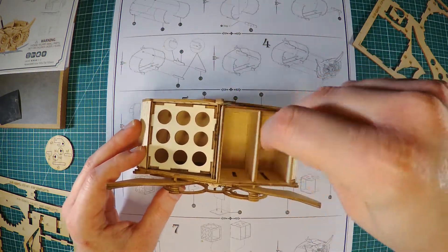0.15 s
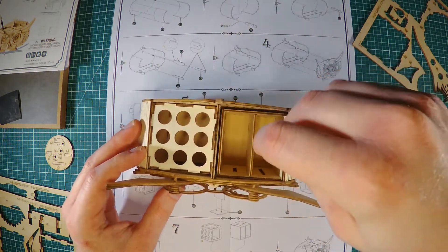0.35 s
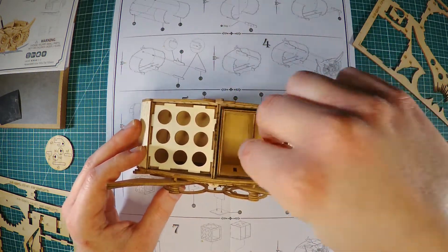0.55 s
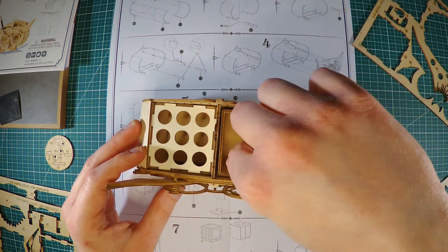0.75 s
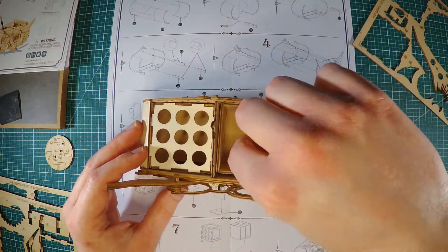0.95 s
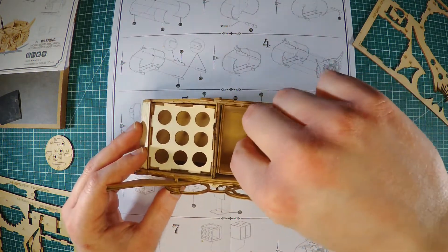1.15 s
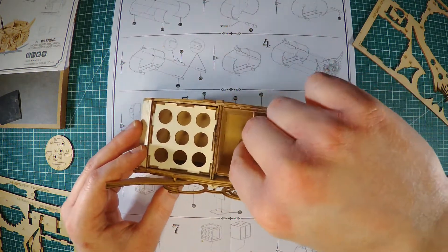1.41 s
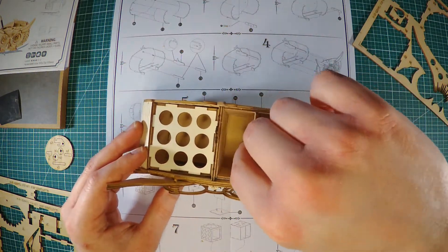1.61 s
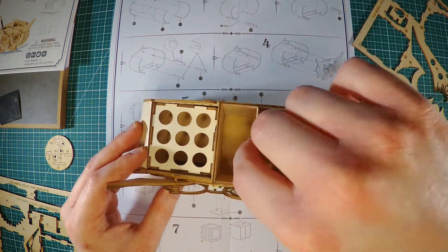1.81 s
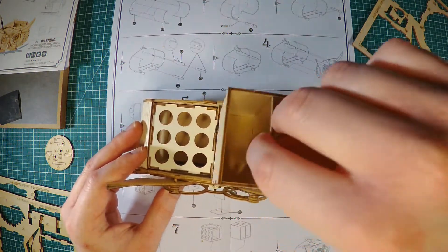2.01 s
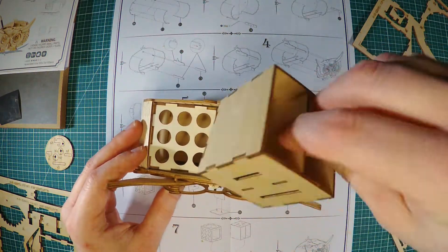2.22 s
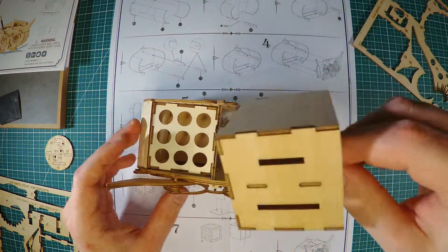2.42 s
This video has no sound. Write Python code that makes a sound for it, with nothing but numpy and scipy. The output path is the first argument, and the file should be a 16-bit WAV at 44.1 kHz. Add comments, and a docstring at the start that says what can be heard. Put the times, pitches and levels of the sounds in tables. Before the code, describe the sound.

Close up, light plywood slides briefly and clacks against its frame, pauses with small tocks and ticks, then drags out with grainy scraping, tiny squeaks and soft final rustles, over low mains hum in a quiet room.

```python
"""A small plywood tray is pushed home in a wooden model on a table, nudged, then drawn out and lifted clear.
Knocks are impulses with noise chatter that ring panel modes, crack at the edge and thump the table.
Sliding is grainy friction noise through wood colours; squeaks are gliding tones; stop taps are hollow tocks.
Close perspective in a small quiet room (side scatter, short noise tail), faint mains hum and noise floor."""
import sys
import numpy as np
from scipy import signal
from scipy.fft import rfft, irfft
from scipy.io import wavfile
from scipy.ndimage import map_coordinates

SR = 44100
rng = np.random.default_rng(int(sys.argv[2]) if len(sys.argv) > 2 else 0)


def output_pcm(signal):
    """Save a mono or channel-first signal as 16-bit PCM at the path in sys.argv[1].

    Samples are clipped to [-1, 1] before scaling.
    """
    pcm = np.clip(np.atleast_2d(signal).T, -1, 1) * 32767
    wavfile.write(sys.argv[1], SR, np.round(pcm).astype(np.int16))


N = 114660
T = np.arange(N) / SR
HALF_S = T[:SR // 2]
TENTH_S = T[:SR // 10]


def undb(db):
    """Decibels to amplitude gain."""
    return 10 ** (np.asarray(db) / 20)


def unit(x):
    """Scale to unit energy."""
    return x / np.sqrt(np.sum(x ** 2) + 1e-18)


def through(x, response):
    """Convolve with an impulse response, cut to N samples."""
    return signal.fftconvolve(x, response)[:N]


def highpass(x, cut_hz, order=2):
    """Butterworth high-pass."""
    return signal.sosfilt(signal.butter(order, cut_hz, "high", fs=SR, output="sos"), x)


def colour(points, size=4096):
    """Minimum-phase unit-energy response with the given spectrum, built by folding the cepstrum."""
    hz, db = np.array(points, float).T
    bin_hz = np.arange(size // 2 + 1) * SR / size
    gain = undb(np.interp(np.log(bin_hz + 1), np.log(hz), db))
    cepstrum = irfft(np.log(gain))
    cepstrum[1:size // 2] *= 2
    cepstrum[size // 2 + 1:] = 0
    return unit(irfft(np.exp(rfft(cepstrum))))


def fade(t60_s):
    """Exponential decay, 60 dB per t60, half a second long."""
    return np.exp(-np.log(1000) * HALF_S / t60_s)


def ring(modes, t60_s):
    """Struck object: damped sines, high-passed at the first mode since it radiates little below."""
    sines = sum(undb(db) * np.sin(2 * np.pi * hz * HALF_S) for hz, db in modes)
    return unit(highpass(sines * fade(t60_s), modes[0][0]))


def blow(start_s):
    """One impulse with the energy of 10 ms at full level."""
    return (np.arange(N) == int(start_s * SR)) * np.sqrt(SR / 100)


def stroke(start_s, length_s, attack_s, release_s):
    """Linear attack, hold, exponential release."""
    rise = np.clip((T - start_s) / attack_s, 0, 1)
    return rise * np.exp(-np.maximum(T - start_s - length_s, 0) / release_s)


def wander(rate_hz):
    """Random control: straight lines between normal values drawn at rate_hz."""
    return np.interp(T * rate_hz, np.arange(8000), rng.standard_normal(8000))


def pan(db):
    """Left and right gains, db apart; positive favours left."""
    return undb(np.array([[db], [-db]]) / 2)


# mains hum partials: (frequency [Hz], RMS level before pan [dB])
HUM_PARTIALS = [(50, -56.5), (150.3, -68.5), (250.3, -82)]
# noise floor spectrum: (frequency [Hz], relative level [dB])
FLOOR_SPECTRUM = [(25, 7.5), (70, -3), (200, -12), (500, -19.5), (1500, -26.5), (5000, -34.5),
                  (15000, -35.5)]
HUM_PAN_DB, FLOOR_DB = 7.5, -63


def background():
    """Mains hum as steady sines, stronger on the left, over independent coloured noise per side."""
    hum = sum(np.sqrt(2) * undb(db) * np.sin(2 * np.pi * (hz * T + rng.random()))
              for hz, db in HUM_PARTIALS)
    air = np.array([through(rng.standard_normal(N), colour(FLOOR_SPECTRUM)) for _ in range(2)])
    return hum * pan(HUM_PAN_DB) + undb(FLOOR_DB) * air


# desk scatter spectrum: (frequency [Hz], relative level [dB])
DESK_SPECTRUM = [(100, -3.5), (1500, -7.5), (4000, -3.5), (15000, 4.5)]
# room tail per band: (level [dB], T60 before the cap [s])
TAIL_BANDS = [(-9, 0.51), (-2, 0.22), (-6.5, 0.32), (-12, 0.3), (-7, 0.28), (-15, 0.33)]
# tail band edges: (frequency [Hz])
TAIL_EDGES_HZ = [40, 260, 750, 1700, 3000, 7000, 16000]
DESK_DECAY_S, DESK_DB = .001, -6.5
TAIL_T60_CAP_S, TAIL_RISE_S, TAIL_LIKENESS = .38, 0.0057, 0.42  # likeness: noise power shared by both sides


def desk_scatter(x):
    """Quick scatter from the desk; an odd kernel shifts phase between the ears, not level."""
    burst = rng.standard_normal(len(HALF_S)) * np.exp(-HALF_S / DESK_DECAY_S)
    desk = unit(through(burst, colour(DESK_SPECTRUM)))[:len(HALF_S)]
    return signal.fftconvolve(x, unit(np.r_[-desk[::-1], 0, desk]), "same")


def room_tail(noise):
    """Room reverberation: noise split into bands, each with its own level and decay."""
    size = len(noise)
    spectrum, hz = rfft(noise), np.arange(size // 2 + 1) * SR / size

    def below(edge_hz):
        """Smooth low-pass gain."""
        return 1 / (1 + (hz / edge_hz) ** 8)

    tail = np.zeros(size)
    for (db, t60_s), low_hz, high_hz in zip(TAIL_BANDS, TAIL_EDGES_HZ, TAIL_EDGES_HZ[1:]):
        band = irfft(spectrum * (below(high_hz) - below(low_hz)), size)
        decay = unit(fade(min(t60_s, TAIL_T60_CAP_S)) * np.minimum(HALF_S / TAIL_RISE_S, 1))
        tail += undb(db) * band * decay
    return tail


def room(x, send):
    """Direct sound plus sideways desk scatter and a partly shared tail per side."""
    shared = rng.standard_normal(len(HALF_S))
    sideways = undb(DESK_DB) * desk_scatter(x)
    out = []
    for side in (1, -1):
        own = rng.standard_normal(len(HALF_S))
        noise = np.sqrt(TAIL_LIKENESS) * shared + np.sqrt(1 - TAIL_LIKENESS) * own
        out.append(x + through(send, room_tail(noise)) + side * sideways)
    return np.array(out)


# catching edges: (start [s], length [s], first pitch [Hz], last pitch [Hz], level before flutter [dB])
SQUEAK_EVENTS = [(0.031, 0.0047, 1720, 1555, -49), (0.175, 0.014, 2980, 2840, -58),
                 (0.861, 0.018, 8000, 7870, -57.5), (1.963, 0.0027, 1400, 1420, -41.5),
                 (1.995, 0.0089, 1111, 1038, -44.5), (1.994, 0.0087, 8700, 8750, -39),
                 (2.038, 0.0048, 2050, 2000, -49), (2.042, 0.0246, 4460, 4250, -57),
                 (2.049, 0.0061, 1340, 1400, -47.5), (2.049, 0.013, 8400, 8600, -49),
                 (2.097, 0.0124, 2400, 2650, -61), (2.098, .012, 4190, 4370, -61)]
SQUEAK_ATTACK_S, SQUEAK_RELEASE_S = 0.0036, 0.00096
SQUEAK_JITTER, SQUEAK_JITTER_HZ, SQUEAK_FLUTTER_DB = .025, 900, 5  # jitter: fraction of pitch


def squeaks():
    """A tight edge sticks and slips fast enough to give a short, rough, gliding tone."""
    out = np.zeros(N)
    for start_s, length_s, first_hz, last_hz, db in SQUEAK_EVENTS:
        glide_hz = np.interp(T, [start_s, start_s + length_s], [first_hz, last_hz])
        hz = glide_hz * (1 + SQUEAK_JITTER * wander(SQUEAK_JITTER_HZ))
        flutter = undb(db + SQUEAK_FLUTTER_DB * wander(SQUEAK_JITTER_HZ))
        level = flutter * stroke(start_s, length_s, SQUEAK_ATTACK_S, SQUEAK_RELEASE_S)
        out += np.sqrt(2) * level * np.sin(2 * np.pi * np.cumsum(hz) / SR)
    return out


# tray on its stop: (time [s], wood level [dB], bass thump level [dB])
STOP_TAPS = [(0.8705, -46.5, -66), (0.8719, -37, -53)]
# stop modes: (frequency [Hz], relative level [dB])
STOP_WOOD_MODES = [(390, -14), (640, 2), (901, -10.5), (1072, 8), (1215, 2), (1577, 13.5), (2035, -3.5),
                   (2264, -10)]
# room standing waves: (frequency [Hz], relative level [dB])
STANDING_WAVES = [(119, 7), (182, -9), (283, -12.5)]
STOP_T60_S, TAP_PUSH_S, STANDING_T60_S = .02, 0.000052, .3


def taps():
    """The tray meets its stop softly: a compact, hollow tock with a little room bass."""
    wood = sum(undb(db) * blow(start_s) for start_s, db, _ in STOP_TAPS)
    thump = sum(undb(db) * blow(start_s) for start_s, _, db in STOP_TAPS)
    tock = unit(through(ring(STOP_WOOD_MODES, STOP_T60_S), np.exp(-TENTH_S / TAP_PUSH_S)))
    return through(thump, ring(STANDING_WAVES, STANDING_T60_S)) - through(wood, tock)


GRAINS_PER_S, GRAIN_SPREAD_DB, SMOOTH_SHARE = 2200, 2.5, .5
CATCHES_PER_S, CATCH_DECAY_S, CATCH_SPREAD_DB, SLIDE_SHARE = 150, .004, 2, .75


def friction():
    """Wood fibres catch and slip: dense uneven grains that flare at each small catch and die back."""
    grain_gain = undb(GRAIN_SPREAD_DB * np.minimum(rng.exponential(size=N), 5))
    grains = (rng.random(N) < GRAINS_PER_S / SR) * rng.choice([-1, 1], N) * grain_gain
    catches = (rng.random(N) < CATCHES_PER_S / SR) * undb(CATCH_SPREAD_DB * rng.uniform(-1, 1, N))
    flare_power = through(catches ** 2, np.exp(-2 * T / CATCH_DECAY_S))
    grip = np.sqrt(SLIDE_SHARE ** 2 + flare_power)
    texture = unit(grains) + SMOOTH_SHARE * unit(rng.standard_normal(N))
    return np.sqrt(N) * unit(grip * texture)


WOBBLE, WOBBLE_HZ = .025, 35  # wobble: fraction of ratio


def shifting(x, ratio):
    """Shift resonances by reading at a varying speed, wobbling as the point of contact shifts."""
    speed = ratio * (1 + WOBBLE * wander(WOBBLE_HZ))
    return map_coordinates(x, [np.cumsum(speed)], mode="mirror")


# short rubs: (start [s], length [s], cavity [dB], panel [dB], rasp [dB], hiss [dB], hollow [dB])
RUB_EVENTS = [(.002, .066, -52.5, -55.5, -53.5, -58, -51),
              (0.098, 0.063, -49.5, -52.5, -55.5, -56.5, -67.5), (0.165, 0.017, -49, -54, -54, -59, -75),
              (0.758, 0.048, -72, -65, -68.5, -77, -74), (0.834, 0.047, -62.5, -57, -59.5, -63, -64),
              (0.885, 0.066, -97.5, -67.5, -73.5, -65, -73.5), (1.167, 0.044, -73, -68, -65, -71, -72),
              (1.464, 0.053, -63, -67, -62, -62.5, -64), (2.198, 0.011, -73, -74, -62, -58.5, -70),
              (2.211, 0.015, -59, -60, -61.5, -57.5, -70), (2.249, 0.085, -67.5, -77, -72, -73, -83),
              (2.309, 0.013, -65.5, -69, -74, -77, -101), (2.428, 0.045, -69, -76.5, -69.5, -73, -79.5)]
# long pull: (time [s], cavity [dB], panel [dB], rasp [dB], hiss [dB], hollow of the opening tray [dB])
PULL_LEVELS = [(1.522, -69, -70, -70.5, -75, -71.5), (1.621, -57.5, -68, -64.5, -67.5, -73),
               (1.652, -53.5, -76, -52, -57.5, -74), (1.68, -49.5, -66, -50, -55, -59.5),
               (1.75, -51.5, -64, -56.5, -57, -77), (1.82, -57, -66, -55.5, -50.5, -60),
               (1.88, -56.5, -65.5, -58, -59.5, -53.5), (1.95, -53.5, -59, -58, -53.5, -56),
               (2.019, -59.5, -64, -60, -52.5, -56), (2.043, -55, -49, -66, -55, -76),
               (2.08, -67, -64.5, -55.5, -54.5, -69), (2.11, -64, -57.5, -67, -59, -98),
               (2.122, -93, -84, -102, -97, -93)]
# tray cavity resonance before wobble: (time [s], frequency [Hz])
CAVITY_TRACK = [(.03, 1500), (.12, 1354), (1.58, 1487), (1.69, 1395), (1.78, 1408), (1.93, 1195),
                (2.04, 1379), (2.11, 1465), (2.3, 1417)]
# rubbing spectra: (frequency [Hz], relative level [dB])
CAVITY_SPECTRUM = [(100, -52.5), (500, -36), (900, -15), (1170, -12.5), (1300, 1), (1400, 0.5), (1520, 3),
                   (1700, -7), (2400, -20), (6000, -49.5)]
PANEL_SPECTRUM = [(500, -26), (1500, -21.5), (1780, -7.5), (1940, -1), (2050, 0.5), (2280, -15.5),
                  (2580, -21.5), (2880, -12), (3200, -25.5), (6000, -47)]
RASP_SPECTRUM = [(300, -46), (1500, -13.5), (2500, -11), (2850, -8.5), (3250, -6.5), (3650, 0.5), (4250, 0),
                 (4700, -4), (5500, -9.5), (6200, -3), (6700, -10.5), (7400, -7), (9000, -24),
                 (16000, -43.5)]
HISS_SPECTRUM = [(500, -54.5), (4000, -34.5), (7000, -7.5), (7800, -2.5), (8400, 1.5), (8850, -3),
                 (9300, 0), (9800, -3.5), (10400, -3), (11700, -12), (13300, -12), (15800, -16.5)]
HOLLOW_SPECTRUM = [(40, -40), (120, -12), (220, -5.5), (350, 3.5), (520, -11.5), (820, -14.5), (1000, 2.5),
                   (1200, -7.5), (1500, -11), (3000, -42)]
CAVITY_REST_HZ = 1400  # reference for the track
RUB_ATTACK_S, RUB_RELEASE_S = 0.016, 0.007
RUMBLE_DB, RUMBLE_T60_S = -12.5, 0.075
HAND_LAG_S, HAND_SWAY_S, HAND_RATE_HZ, HAND_DB = .0016, 0.00023, 7, -8


def slide_drives():
    """Drive gains of the five wood colours: the pull's level curves plus each rub's stroke."""
    times_s, *levels = np.array(PULL_LEVELS).T
    drives = [undb(np.interp(T, times_s, db, left=-140, right=-140)) for db in levels]
    for start_s, length_s, *rub_levels in RUB_EVENTS:
        shape = stroke(start_s, length_s, RUB_ATTACK_S, RUB_RELEASE_S)
        for k, db in enumerate(rub_levels):
            drives[k] = drives[k] + undb(db) * shape
    return drives


def hand_reflection(x):
    """The moving hand reflects the slides: one echo with a swaying delay, power-compensated."""
    lag_s = HAND_LAG_S + HAND_SWAY_S * wander(HAND_RATE_HZ)
    echo = map_coordinates(x, [(T - lag_s) * SR])
    return (x + undb(HAND_DB) * echo) / np.hypot(1, undb(HAND_DB))


def slides():
    """One friction force drives cavity, panel, edge rasp, hiss, hollow and a faint rumble."""
    cavity_drive, panel_drive, rasp_drive, hiss_drive, hollow_drive = slide_drives()
    force = friction()
    cavity_ratio = np.interp(T, *np.array(CAVITY_TRACK).T) / CAVITY_REST_HZ
    cavity = cavity_drive * shifting(through(force, colour(CAVITY_SPECTRUM)), cavity_ratio)
    rasp = rasp_drive * shifting(through(force, colour(RASP_SPECTRUM)), 1)
    panel = through(force * panel_drive, colour(PANEL_SPECTRUM))
    hiss = through(force * hiss_drive, colour(HISS_SPECTRUM))
    hollow = through(force * hollow_drive, colour(HOLLOW_SPECTRUM))
    rumble = undb(RUMBLE_DB) * through(force * rasp_drive, ring(STANDING_WAVES, RUMBLE_T60_S))
    return hand_reflection(cavity + rasp + panel + hiss + hollow + rumble)


# tray on frame: (time [s], chatter decay [s], panel [dB], crack [dB], table thump [dB], low cut [Hz]);
# a small point of contact has a higher cut
KNOCK_EVENTS = [(.058, 0.036, -48, -53, -46.5, 488), (0.2148, 0.0088, -49.5, -46.5, -52, 980),
                (0.227, 0.0069, -38, -50.5, -49, 900), (0.2382, 0.009, -36.5, -32, -30.5, 308),
                (0.2421, 0.0013, -27.5, -33, -22, 199), (.252, 0.0018, -29.5, -35, -49, 251),
                (0.994, 0.011, -65, -77, -87, 1380), (1.1, 0.0091, -55.5, -56.5, -83.5, 1390),
                (1.3054, 0.0095, -43.5, -44.5, -67.5, 1200), (1.312, 0.0085, -45, -46.5, -62.5, 690),
                (1.32, 0.0017, -46.5, -45.5, -45, 300), (1.397, 0.0006, -63, -59.5, -73, 1492),
                (1.486, 0.0034, -50.5, -66, -54.5, 380), (1.9654, 0.0036, -51, -50, -59, 790),
                (1.994, 0.0048, -52, -47, -71, 810), (2.1988, 0.002, -59, -55, -51, 416)]
# panel modes: (frequency before detune [Hz], relative level [dB])
KNOCK_PANEL_MODES = [(490, -2), (960, -6.5), (1275, -15.5), (1465, 3), (1690, 1.5), (1895, 5), (2100, 0.5),
                     (2372, -9), (2720, -5.5), (3550, -12), (4220, -11)]
# table modes: (frequency [Hz], relative level [dB])
KNOCK_TABLE_MODES = [(88, -22), (122, -7.5), (160, 0.5), (185, -2), (228, -1.5), (282, -0.5), (347, 4)]
# edge crack spectrum: (frequency [Hz], relative level [dB])
CRACK_SPECTRUM = [(300, -17.5), (800, -12.5), (2000, 2.5), (4000, -0.5), (5500, -4.5), (7500, -7.5),
                  (9200, -3.5), (11500, -10), (14000, -10), (16000, -27.5)]
PANEL_T60_S, PANEL_DETUNE = .022, .025  # detune: fraction of frequency
TABLE_T60_S, STANDING_DB = 0.075, -10.5
CHATTER_SHARE, CONTACT_S, THUMP_PUSH_S = 1, 0.00098, 0.00095


def knocks():
    """Blows chatter, ring detuned panels, crack at the edge and thump the table, waking room bass."""
    panel, crack, table = np.zeros((3, N))
    for start_s, decay_s, panel_db, crack_db, table_db, cut_hz in KNOCK_EVENTS:
        hit = blow(start_s)
        contact = highpass(hit + 1e-18, cut_hz)
        envelope = np.minimum(TENTH_S / CONTACT_S, 1) * np.exp(-TENTH_S / decay_s)
        chatter = through(contact, unit(rng.standard_normal(len(TENTH_S)) * envelope))
        modes = [(hz * (1 + PANEL_DETUNE * rng.uniform(-1.1, 1)), db) for hz, db in KNOCK_PANEL_MODES]
        force = (contact + CHATTER_SHARE * chatter) / np.hypot(1, CHATTER_SHARE)
        panel += undb(panel_db) * through(force, ring(modes, PANEL_T60_S))
        crack += undb(crack_db) * chatter
        table += undb(table_db) * hit
    standing = undb(STANDING_DB) * ring(STANDING_WAVES, STANDING_T60_S)
    bass = ring(KNOCK_TABLE_MODES, TABLE_T60_S) + standing
    thump = unit(through(bass, np.exp(-TENTH_S / THUMP_PUSH_S)))
    return panel + through(crack, colour(CRACK_SPECTRUM)) - through(table, thump)


WOOD_PAN_DB, TAP_ROOM_DB = -0.63, -3


def scene():
    """The handled wood in its room over the background; taps inside the frame reach the tail less."""
    wood = knocks() + slides() + squeaks()
    inner = taps()
    placed = room(wood + inner, wood + undb(TAP_ROOM_DB) * inner)
    return placed * pan(WOOD_PAN_DB) + background()


TOP_HZ = 15750


def record(dry):
    """Steep elliptic low-pass cuts the top."""
    return signal.sosfilt(signal.ellip(10, .2, 70, TOP_HZ, fs=SR, output="sos"), dry)


dry = scene()
out = record(dry)
output_pcm(out)
```